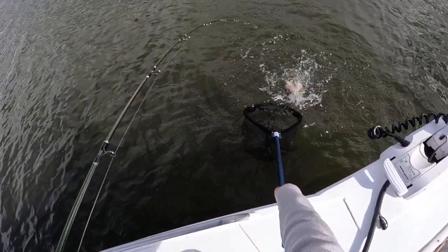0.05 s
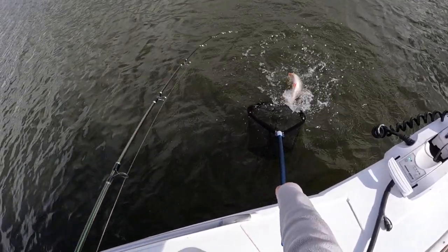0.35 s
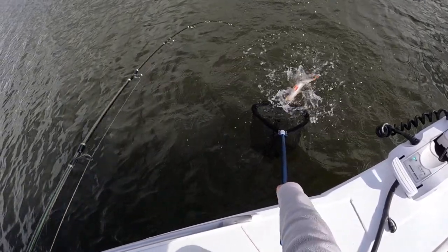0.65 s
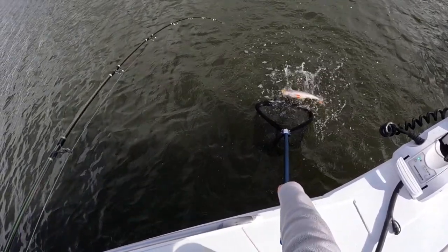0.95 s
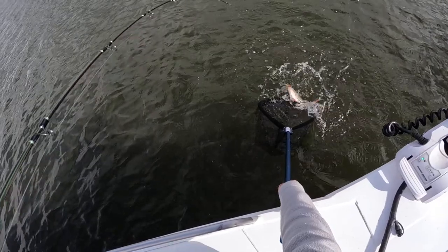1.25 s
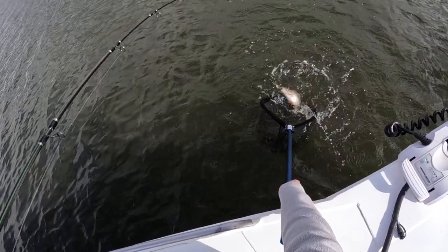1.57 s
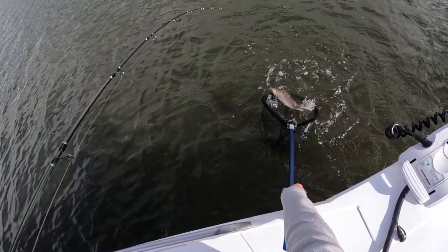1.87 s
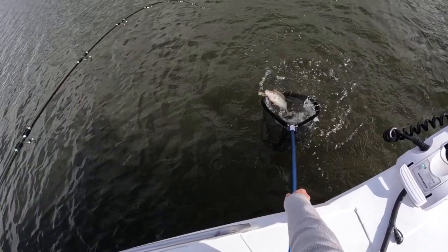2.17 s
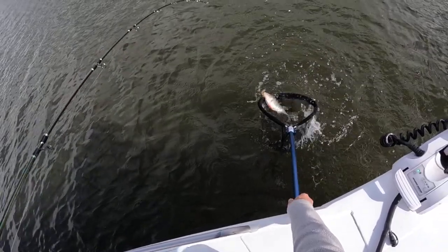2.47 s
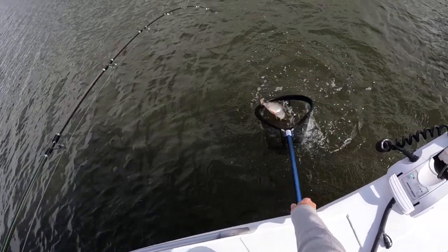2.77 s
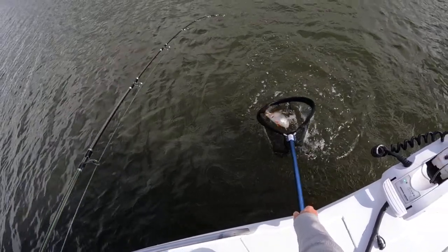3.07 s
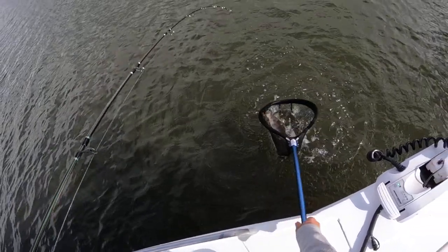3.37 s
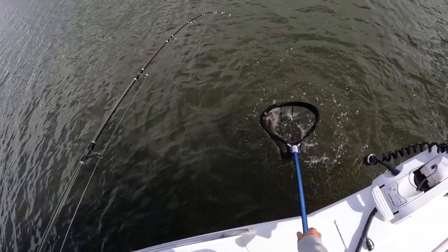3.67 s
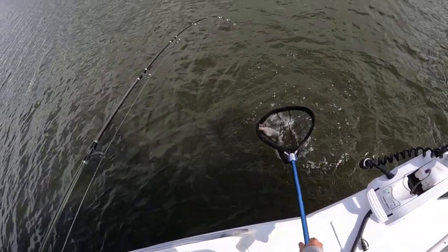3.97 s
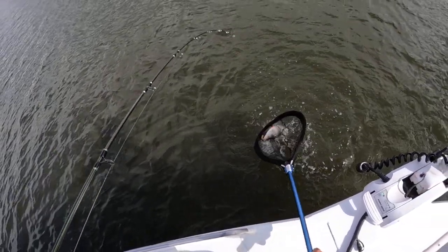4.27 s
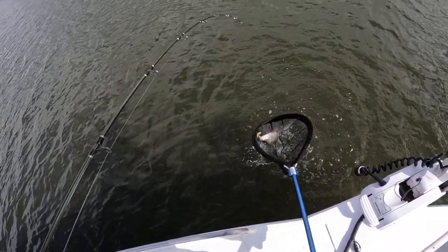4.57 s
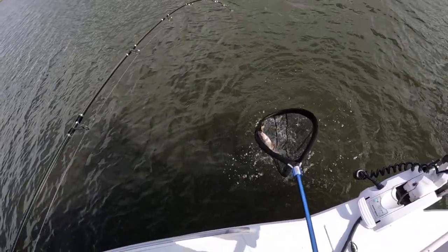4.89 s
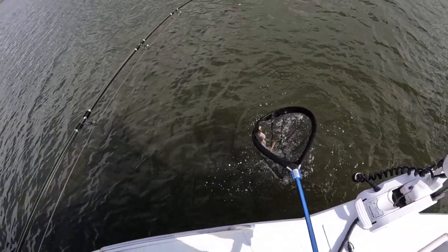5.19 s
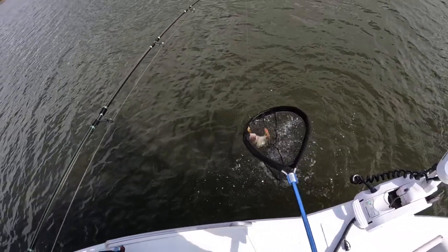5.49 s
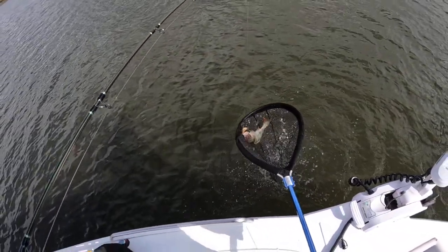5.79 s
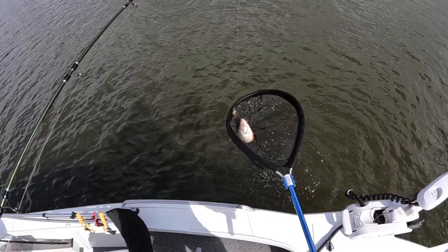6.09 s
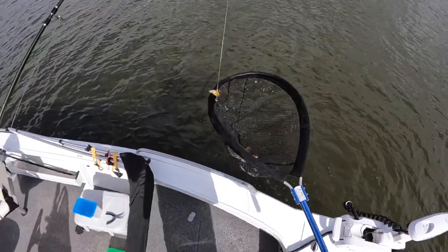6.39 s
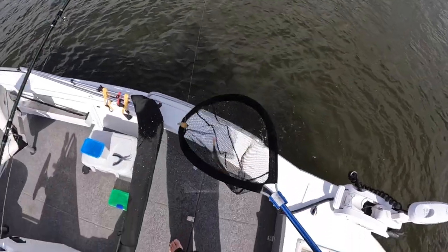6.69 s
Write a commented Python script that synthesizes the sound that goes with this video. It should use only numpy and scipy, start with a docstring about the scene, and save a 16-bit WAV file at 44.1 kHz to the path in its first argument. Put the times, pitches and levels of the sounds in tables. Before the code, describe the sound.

A fish thrashes at the water surface beside a small boat, sounding muffled through the waterproof case of a body-worn camera. The first flurry of slaps, splashes and deep gulping bubbles fills the opening 0.7 seconds, with spray pattering back. A short sharp splash follows at about 1.3 seconds. From 1.8 to 3.5 seconds the fish churns the water in repeated bursts with plops and gurgles, and a dull knock hits the case near 2 seconds. Lighter sloshing comes around 4 seconds, then another knock and a splash at 4.3 to 4.5 seconds as the landing net lifts. Quieter drips and small plops follow until about 5.9 seconds. Faint low wind rumble rises and falls underneath. From 6 seconds to the end at about 6.7, clothing rubs across the case with a cluster of close, hollow thumps, scraping and a scratchy hiss.

```python
"""A hooked fish thrashes beside a small boat and is lifted out in a landing net, which then drips.
Its body slaps the surface and drags air under: big pockets gulp, crowds of bubbles ring, spray patters
back. The water sounds muffled, heard from inside the waterproof case of a body-worn camera.
Wind rumbles on the case, knocks set it ringing and, at the end, clothing rubs across it."""
import sys
import numpy as np
from scipy import signal
from scipy.fft import rfft, irfft, next_fast_len
from scipy.io import wavfile
from scipy.ndimage import uniform_filter1d

SR = 44100
rng = np.random.default_rng(int(sys.argv[2]) if len(sys.argv) > 2 else 0)


def to_wav(sig):
    """Store sig (one row per channel, or 1-D mono) as 16-bit WAV at the path in sys.argv[1].

    Samples outside -1..1 are clipped; the rate is SR.
    """
    pcm = np.clip(np.atleast_2d(sig), -1, 1) * 32767
    pcm = np.round(pcm).astype(np.int16)
    wavfile.write(sys.argv[1], SR, pcm.T)  # frames by channels


N = 297214


def from_db(db):
    return 10 ** (np.asarray(db) / 20)


def unit_rms(x):
    return x / np.sqrt(np.mean(x ** 2) + 1e-20)


def decay(t, t60):
    """A tail that falls 60 dB in t60 seconds."""
    return np.exp(-np.log(1000) * t / t60)


def add(track, start_s, sound):
    """Mix a sound into a track."""
    start = int(np.clip(round(start_s * SR), 0, N))
    track[start:start + len(sound)] += sound[:N - start]


def cut(x, hz, kind, order=2):
    """Low-, high- or band-pass."""
    sos = signal.butter(order, np.clip(hz, 10, .45 * SR), kind, fs=SR, output="sos")
    return signal.sosfilt(sos, x + 1e-18 * np.sin(np.arange(len(x))))


def ring(force, hz, t60):
    """A resonator: a unit click sets off a dying sine of height 1."""
    radius, angle = decay(1 / SR, t60), 2 * np.pi * hz / SR
    return signal.lfilter([0, np.sin(angle)], [1, -2 * radius * np.cos(angle), radius ** 2], force + 1e-18)


def drift(per_s):
    """A modulator that glides between random values of spread 1."""
    knots = rng.standard_normal(4000)
    return np.interp(np.arange(N) / SR * per_s, np.arange(len(knots)), knots)


def levelled(x, window_s):
    """Ride a texture to rms 1 over the window; its fine grain stays."""
    size = max(int(window_s * SR / 2), 2)
    power = uniform_filter1d(uniform_filter1d(x * x, size), size)
    return x / np.sqrt(np.abs(power) + 1e-12)


def noise(spectrum):
    """Noise at rms 1, shaped by an EQ curve and rolled off beyond its ends."""
    hz, db = np.transpose(spectrum)
    size = next_fast_len(N)
    freqs = np.maximum(np.fft.rfftfreq(size, 1 / SR), 1)
    roll_off = np.minimum(freqs / hz[0], 1) ** 2 * np.minimum(hz[-1] / freqs, 1) ** 6
    colour = roll_off * from_db(np.interp(np.log(freqs), np.log(hz), db))
    return unit_rms(irfft(rfft(rng.standard_normal(N), size) * colour, size)[:N])


def clicks(per_s, spread_db):
    """Random clicks of uneven size and sign."""
    sizes = from_db(spread_db * np.minimum(rng.exponential(1, N), 4)) * rng.choice([-1, 1], N)
    return sizes * (rng.random(N) < per_s / SR)


def gesture(start_s, hold_s, attack_s, release_db_per_s):
    """Envelope of one movement: it reaches 1 at its start, holds, and dies away."""
    t = np.arange(N) / SR - start_s
    attack_db = 20 / np.log(10) * (np.minimum(t, 0) / attack_s) ** 2
    release_db = release_db_per_s * np.maximum(t - hold_s, 0)
    return from_db(-np.minimum(attack_db + release_db, 200))


# The bass-heavy colour of the rush. Each row: frequency in Hz, relative level in dB.
RUSH_EQ = [(25, -0.5), (50, 11), (120, 4.5), (220, -3.5), (500, -16), (1000, -29), (2000, -33), (3000, -36)]
# The wind rising and falling. Each row: time in seconds, relative level in dB.
WIND_LEVELS = [(0, -57.5), (1.1, -66.5), (1.65, -64.5), (2.0, -56.5), (2.7, -56.5), (3.0, -66.5),
               (4.15, -67.5), (4.45, -56.5), (5.1, -58), (5.4, -67), (6.74, -47.5)]


def wind_and_heave(deep_db):
    """A low rush on the case: wind, and the heave of the water wherever it is churned deeply."""
    times, levels_db = np.transpose(WIND_LEVELS)
    wind = from_db(np.interp(np.arange(N) / SR, times, levels_db) - 3)
    heave = from_db(deep_db - 22.5)
    return np.hypot(wind, heave) * noise(RUSH_EQ)


# The resonances of the case on its mount. Each row: pitch in Hz, gain in dB, 60 dB decay in seconds.
CASE_MODES = [(54.3, -16, 0.29), (127, 6, 0.061), (192, 9.5, 0.028), (268.5, -3.5, 0.03), (402, -40, 0.075),
              (920, -11.5, 0.015)]


def case_body(force):
    """The case answers a force with its modes; slow pushes make no sound."""
    return sum(from_db(db) * cut(ring(force, hz, t60), 0.58 * hz, "high", order=1)
               for hz, db, t60 in CASE_MODES)


# Knocks on the case. Each row: start in seconds, peak level in dB, hardness as a low-pass cutoff in Hz.
KNOCKS = [(0.442, -36.5, 70), (1.961, -20, 577), (2.395, -32, 300), (2.68, -41.5, 60), (4.273, -20.5, 491),
          (4.313, -34.5, 153), (4.376, -29, 161), (4.758, -51, 117), (4.966, -28, 490), (4.992, -40, 70),
          (5.033, -45, 298), (5.086, -46, 59.5), (5.106, -44.5, 60), (6.042, -16, 347),
          (6.082, -18.5, 1100), (6.106, -17, 405), (6.187, -20.5, 583), (6.239, -24.5, 560),
          (6.31, -21.5, 294), (6.35, -19.5, 345.5), (6.371, -15, 520), (6.599, -33, 800), (6.713, -22, 300)]


def case_knocks():
    """Soft knocks thud in the case; harder ones reach its higher modes."""
    out, tap = np.zeros(N), signal.unit_impulse(SR // 5)
    for start_s, db, hardness_hz in KNOCKS:
        force = cut(tap, hardness_hz, "low")
        knock = cut(case_body(force), 64, "high")
        add(out, start_s, from_db(db) * knock / np.abs(knock).max())
    return out


def zip_tone(hz, length_s, octaves, waver=0.13):
    """A fibre snaps over the weave; its wavering pitch glides as its speed changes."""
    progress = np.linspace(0, 1, int(length_s * SR))
    wobble = np.interp(progress * length_s * 700, np.arange(100), rng.standard_normal(100))
    pitch = hz * 2 ** (octaves * progress) * (1 + waver * wobble)
    return np.sin(np.pi * progress) * np.sin(2 * np.pi * np.cumsum(pitch) / SR)


# The featured fibre zips. Each row: start in seconds, relative level in dB, starting pitch in Hz,
# length in seconds, glide in octaves (negative falls).
FIBRE_ZIPS = [(5.976, -37, 1520, 0.0085, 1.06), (6.175, -42, 2015, 0.014, 0.26),
              (6.2, -31, 2470, 0.002, 0.69), (6.26, -47.5, 2030, 0.038, 0.2),
              (6.452, -46, 1563, 0.099, -0.48), (6.622, -49.5, 2100, 0.041, -0.25)]


def fibre_zips(hiss_db, rub_start_s, count=45):
    """Fibres catch on an edge: a few distinct zips, and tiny rising ones that follow the hiss level."""
    out = np.zeros(N)
    for start_s, db, hz, length_s, octaves in FIBRE_ZIPS:
        add(out, start_s, from_db(db - 2.5) * zip_tone(hz, length_s, octaves))
    for when, octaves_up, strength in rng.random((count, 3)):
        start_s = rub_start_s + when * (N / SR - rub_start_s)
        gain = strength * from_db(hiss_db[int(start_s * SR)] + 6)
        add(out, start_s, gain * zip_tone(1700 * 2 ** octaves_up, length_s=0.0071, octaves=0.89))
    return out


# The colour of sliding cloth. Each row: frequency in Hz, relative level in dB.
CLOTH_EQ = [(1000, -9), (1500, 0), (2200, 1), (3200, 4.5), (4700, 2), (6500, -4), (8200, -5.5),
            (10000, -25)]


def cloth_hiss(hiss_db, rub_start_s, patchy_db=4, grain_db=4.96, opening_s=0.11):
    """Each fold sounds its own part of the treble; the top opens as the cloth gathers speed."""
    cloth, edges_hz = noise(CLOTH_EQ), np.geomspace(1000, 11000, 9)
    folds = sum(cut(cloth, band, "band") * from_db(patchy_db * drift(55))
                for band in zip(edges_hz, edges_hz[1:]))
    bright = from_db(hiss_db + 1) * unit_rms(folds * from_db(grain_db * drift(320)))
    dull = cut(bright, 3640, "low", order=1)
    speed = np.clip((np.arange(N) / SR - rub_start_s) / opening_s, 0, 1)
    return speed * bright + (1 - speed) * dull


# Strokes of cloth over the case. Each row: start in seconds, hold in seconds, relative rumble level
# in dB, then offsets from it in dB for scrape and for hiss.
CLOTH_STROKES = [(5.983, 0.11, -27, -12, -22.5), (6.054, 0.093, -27.5, -7, -28),
                 (6.18, 0.081, -35.5, -30, -17.5), (6.322, 0.082, -28, -28.5, -39),
                 (6.466, 0.07, -35.5, -19, -35), (6.609, 0.0075, -40, 5, -15),
                 (6.691, 0.057, -35, -14, -28.5)]


def clothing_rub():
    """Cloth sticks and slips on the case: a rumble in its modes, a scrape, a shifting hiss and zips."""
    power = np.full((3, N), 1e-18)
    for start_s, hold_s, db, scrape_offset, hiss_offset in CLOTH_STROKES:
        stroke = gesture(start_s, hold_s, attack_s=0.03, release_db_per_s=326)
        gains = from_db([db, db + scrape_offset, db + hiss_offset])
        power += np.outer(gains, stroke) ** 2
    rumble_db, scrape_db, hiss_db = 10 * np.log10(power)
    slips = cut(clicks(per_s=790, spread_db=7), 290, "low")
    rumble = from_db(rumble_db - 2) * levelled(cut(case_body(slips), 45, "high"), window_s=0.033)
    grit = cut(clicks(per_s=830, spread_db=2.5), [290, 620], "band")
    scrape = from_db(scrape_db - 4) * levelled(cut(grit, 1200, "low"), window_s=0.19)
    rub_start_s = CLOTH_STROKES[0][0]
    return rumble + scrape + cloth_hiss(hiss_db, rub_start_s) + fibre_zips(hiss_db, rub_start_s)


def boat_echo(x, echo_db=-17, t60=0.29, predelay_s=0.006):
    """Hull, deck and waves scatter a short, thin tail."""
    t = np.arange(SR // 3) / SR
    tail = cut(rng.standard_normal(len(t)), 200, "high") * decay(t, t60) * (t > predelay_s)
    return from_db(echo_db) * signal.fftconvolve(x, tail / np.linalg.norm(tail))[:N]


def bubble(hz, swell_s, t60, octaves_per_s, settle_s=0.022):
    """A pocket of air swells into ringing and dies; its pitch bends briefly, up as it nears the surface."""
    t = np.arange(-int(swell_s * SR), int(t60 * SR)) / SR
    attack = np.sin(np.pi / 2 * np.minimum(1 + t / swell_s, 1)) ** 2
    pitch = hz * 2 ** (octaves_per_s * settle_s * np.tanh(t / settle_s))
    return attack * decay(np.maximum(t, 0), t60) * np.sin(2 * np.pi * np.cumsum(pitch) / SR)


def bubble_cloud(db, low_hz, high_hz, per_s, spread_db, tilt_db_per_octave, ring_cycles=22, sizes=22):
    """Bubbles of many sizes pinch off at random; louder water holds more of them."""
    crowding = from_db(0.13 * (db - db.max()))
    births = clicks(per_s * crowding, spread_db)
    size_of = rng.integers(0, sizes, N)
    cloud = np.zeros(N)
    for size, hz in enumerate(np.geomspace(low_hz, high_hz, sizes)):
        gain = from_db(tilt_db_per_octave * np.log2(hz / low_hz))
        cloud += gain * ring(births * (size_of == size), hz, ring_cycles / hz)
    return from_db(db) * levelled(cut(cloud, 0.87 * low_hz, "high"), window_s=0.07)


def gurgle(db, low_hz, high_hz, per_s, ring_cycles, octaves_per_s, spread_db):
    """A few bubbles ring longer than the crowd and chirp upward."""
    out, draws = np.zeros(N), rng.random((600, 3))
    times = np.cumsum(-np.log(1 - draws[:, 0])) / per_s
    for start_s, (_, height, strength) in zip(times[times < N / SR], draws):
        hz = low_hz * (high_hz / low_hz) ** height
        gain = from_db(db[int(start_s * SR)] + spread_db * strength)
        add(out, start_s, gain * bubble(hz, 2 / hz, ring_cycles / hz, octaves_per_s))
    return out


CALM_DEEP_DB, CALM_SPLASH_DB, CALM_SPRAY_DB = -68, -70, -72  # ripples between splashes


def churn(deep_db, splash_db, spray_db, clump_db=5, fully_lumpy_db=20.5):
    """Three sizes of air in the water: deep pockets, splash bubbles, fine ones under falling spray."""
    lumpiness = np.clip((spray_db - CALM_SPRAY_DB) / fully_lumpy_db, .35, 1)
    lumps_db = clump_db * lumpiness * drift(70)  # thrown water comes down in separate lumps
    deep = bubble_cloud(deep_db - 1.5, 145, 400, per_s=420, spread_db=6, tilt_db_per_octave=8)
    splash = bubble_cloud(splash_db - 0.5 + lumps_db / 2, 394, 968,
                          per_s=850, spread_db=1, tilt_db_per_octave=0)
    spray = bubble_cloud(spray_db - 4 + lumps_db, 1022, 3100,
                         per_s=1600, spread_db=-2, tilt_db_per_octave=-8.5)
    plops = gurgle(splash_db - 0.5, 400, 950, per_s=24, ring_cycles=34, octaves_per_s=15, spread_db=14.5)
    plinks = gurgle(spray_db - 0.5, 1000, 2200, per_s=25, ring_cycles=60, octaves_per_s=14, spread_db=3.5)
    return deep + splash + spray + plops + plinks


# Single big bubbles and drips. Each row: time of full swing in seconds, relative level in dB, pitch
# in Hz, 60 dB decay in seconds, steepest bend in octaves per second (negative falls).
BIG_BUBBLES = [(.116, -36, 340, 0.15, -3.5), (0.136, -17, 336.4, 0.12, -3), (.167, -16, 476, 0.045, 32),
               (.2, -25.5, 253, 0.035, 33.5), (.288, -29.5, 727, 0.015, 14), (.315, -19.5, 424, 0.036, -21),
               (0.358, -25.5, 262, 0.11, 44), (.374, -28, 538, 0.043, 28), (0.417, -25, 500, 0.032, 14),
               (.435, -22.5, 209, 0.11, 17), (.499, -20, 318, .02, 21), (0.52, -20, 228, .055, 7.5),
               (.536, -27, 619, 0.16, 11.5), (.615, -27, 622, 0.072, 9.5), (.715, -41.5, 672, 0.15, 7.5),
               (.875, -43.5, 650, 0.012, 8), (0.968, -51, 1840, 0.052, -5), (1.275, -15, 528, 0.017, 11),
               (1.3, -26.5, 726, 0.07, -7), (1.578, -41, 792, 0.064, -9.5), (1.877, -35.5, 358, .054, 6),
               (1.912, -29.5, 240, 0.12, 6), (1.948, -27, 578, 0.065, 16), (1.961, -19.5, 262, 0.12, -8.5),
               (2.157, -41, 355, 0.11, 25), (2.195, -25, 576, .028, -8.5), (2.258, -35, 420, 0.15, -7.5),
               (2.291, -27, 261, 0.16, 21), (2.321, -22, 272, 0.018, 38), (2.392, -23, 183.4, 0.12, -5.5),
               (2.412, -24, 204, 0.11, -8.5), (2.457, -23.5, 639, 0.082, -6.5),
               (2.554, -24.5, 638, 0.04, -21.5), (2.687, -28, 627, 0.03, 16), (2.875, -27, 706, 0.078, 33),
               (2.903, -21.5, 437, 0.1, -2.5), (2.997, -20.5, 410, 0.017, 46), (3.171, -27, 403, 0.058, 16),
               (3.334, -42.5, 527, 0.029, 3), (3.398, -28, 670, 0.04, 19), (3.406, -33, 262.6, 0.084, -2),
               (3.434, -26.5, 746, 0.077, -1.5), (3.807, -36, 188, 0.053, 31.5),
               (3.918, -38, 570, 0.11, 5.5), (3.944, -34, 594, .052, -8), (4.122, -30, 352, 0.054, 40),
               (4.138, -37, 272, 0.079, 34), (4.28, -17.5, 127, 0.1, 5), (4.818, -52, 1106, 0.051, -9),
               (5.284, -42, 833, .04, 12), (5.332, -39.5, 422, 0.072, 24.5),
               (5.427, -41.5, 437, 0.083, 6.5), (5.567, -41.5, 310, 0.043, 6.5),
               (5.615, -35.5, 808, 0.051, -10), (5.628, -38.5, 192, .04, 41),
               (5.699, -34.5, 266, 0.065, 20.5)]


def gulps(swell_cycles=2.61, flutter_db=2.1, flutter_per_s=260):
    """Each big bubble sounds its own note, which flutters as the surface shakes."""
    out = np.zeros(N)
    for peak_s, db, hz, t60, octaves_per_s in BIG_BUBBLES:
        swell_s = swell_cycles / hz
        add(out, peak_s - swell_s, from_db(db + 0.28) * bubble(hz, swell_s, t60, octaves_per_s))
    return out * from_db(flutter_db * drift(flutter_per_s))


# Fins, tail and falling water hitting the surface. Each row: start in seconds, peak level in dB,
# pitch in Hz, 60 dB decay of the burst in seconds.
SURFACE_SLAPS = [(0.029, -33, 1287, 0.079), (0.243, -31.5, 1277, 0.058), (.312, -27, 597, 0.039),
                 (0.325, -22.5, 1865, 0.02), (.448, -21, 780, 0.018), (.55, -23, 1071, 0.07),
                 (1.184, -29.5, 1340, 0.026), (1.269, -16.5, 893, 0.02), (1.328, -28.5, 1960, 0.014),
                 (1.964, -20, 822, 0.015), (1.971, -19.5, 2480, 0.0073), (1.996, -26.5, 1435, 0.012),
                 (2.426, -31.5, 1280, 0.089), (2.588, -32, 817, 0.12), (2.78, -41, 1950, .044),
                 (2.719, -32.5, 1720, 0.065), (2.853, -27, 870, 0.025), (2.995, -20.5, 600, 0.084),
                 (2.995, -27.5, 2556, 0.035), (3.002, -28.5, 1388, 0.074), (3.153, -35, 986, 0.11),
                 (4.345, -31, 1870, 0.11), (4.465, -23.5, 1150, 0.04), (5.17, -43, 2026, 0.091),
                 (5.629, -44, 1430, 0.035), (5.856, -33.5, 953, 0.059)]


def slaps(shatter=0.35, ring_share=0.43, entry_s=0.0022):
    """A hit gives one heavily damped ring and a short burst as the sheet of water breaks."""
    out, t = np.zeros(N), np.arange(SR // 10) / SR
    attack = np.minimum(t / entry_s, 1)  # the contact area grows, which rounds the attack
    for start_s, db, hz, t60 in SURFACE_SLAPS:
        band = cut(rng.standard_normal(len(t)), [hz * 0.85, hz * 1.324], "band")
        burst = unit_rms(band) * decay(t, t60)
        tone = ring(t == 0, hz, t60 * ring_share)
        hit = cut(attack * (tone + shatter * burst), hz * 0.29, "high")
        add(out, start_s, from_db(db) * hit / np.abs(hit).max())
    return out


# The fish or the net churning the water. Each row: start in seconds, hold in seconds, relative splash
# level in dB, then offsets from it in dB for deep air, for spray and for the patter falling back.
FISH_THRASHES = [(0.028, 0.017, -55.5, 4.5, 5.5, -7.5), (0.19, 0.12, -47.5, 4.5, -0.5, -19),
                 (0.333, 0.14, -39.5, 3, -2, -18), (0.528, 0.032, -31, -3.5, -8.5, -21),
                 (0.577, 0.044, -44, 2, 2.5, -7), (1.191, 0.032, -47, -13.5, 5, -16.5),
                 (1.27, 0.025, -37.5, -20.5, 0.5, -27.5), (1.303, 0.021, -47.5, -0.5, -16, -29),
                 (1.8, 0.018, -62.5, 7, 2, -5.5), (1.88, 0.091, -43.5, 3, -23.5, -19),
                 (1.969, 0.029, -37.5, 3.5, -0.5, -14), (2.164, 0.054, -49.5, -2.5, -26, -21.5),
                 (2.293, 0.092, -43, 7, -10.5, -16), (2.422, 0.14, -44.5, 6, -4.5, -11.5),
                 (2.695, 0.12, -50, -6, -7.5, -8), (2.888, 0.038, -37, -20, -21, -16),
                 (2.995, 0.023, -42.5, 8, -5, -13.5), (3.172, 0.028, -46, -17, -13.5, -11.5),
                 (3.41, 0.029, -47.5, 2, -11, -12), (3.915, 0.18, -58, -2, -6, -18),
                 (4.253, 0.13, -42, -8, -4, -15.5), (4.467, 0.0058, -38.5, -13, -11, -19),
                 (5.593, 0.031, -68, 12, -13, -21)]


def thrash_levels(build_s=0.02):
    """Deep air, splash and spray envelopes in dB: each thrash builds, collapses and leaves a patter."""
    calm = from_db([CALM_DEEP_DB, CALM_SPLASH_DB, CALM_SPRAY_DB])
    power = np.outer(calm, np.ones(N)) ** 2
    for start_s, hold_s, db, deep_offset, spray_offset, patter_offset in FISH_THRASHES:
        burst = gesture(start_s, hold_s, build_s, release_db_per_s=290.5)
        patter = from_db(patter_offset) * gesture(start_s, hold_s, build_s, release_db_per_s=51)
        gains = from_db([db + deep_offset, db, db + spray_offset])
        power += np.outer(gains, np.maximum(burst, patter)) ** 2
    return 10 * np.log10(power)


def scene(case_cutoff_hz=2408):
    """Airborne sound loses its treble in the sealed case; contact sound comes straight through."""
    deep_db, splash_db, spray_db = thrash_levels()
    water = churn(deep_db, splash_db, spray_db) + gulps() + slaps()
    muffled = cut(water + boat_echo(water), case_cutoff_hz, "low", order=8)
    noise_floor = from_db(-101) * rng.standard_normal((2, N))
    return muffled + wind_and_heave(deep_db) + case_knocks() + clothing_rub() + noise_floor


def record(dry, stopband_hz=11000):
    """A steep low-pass takes the very top off the mix."""
    return signal.sosfilt(signal.cheby2(12, 50, stopband_hz, fs=SR, output="sos"), dry)


dry = scene()
out = record(dry)
to_wav(out)
```